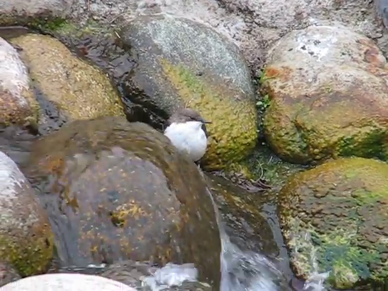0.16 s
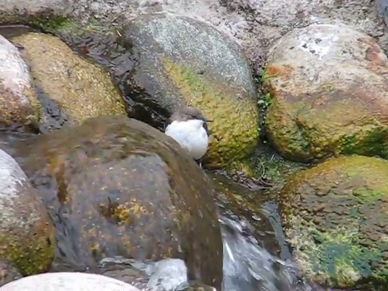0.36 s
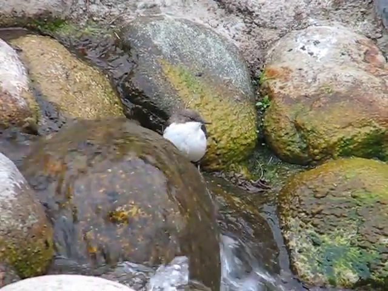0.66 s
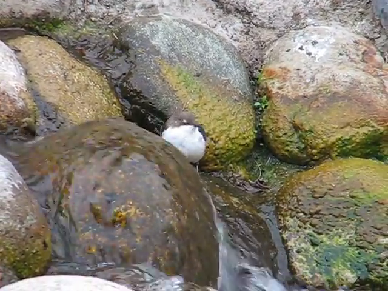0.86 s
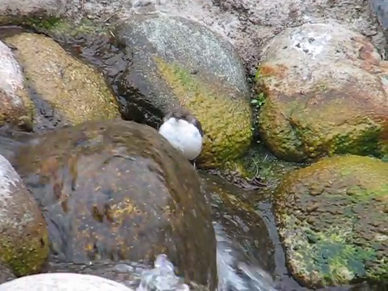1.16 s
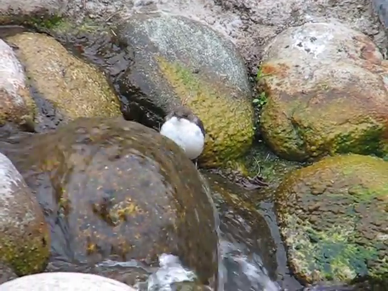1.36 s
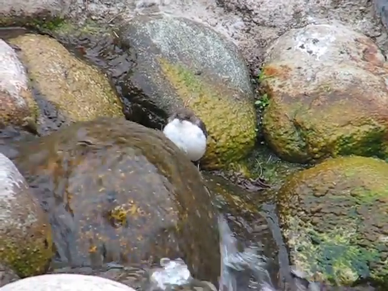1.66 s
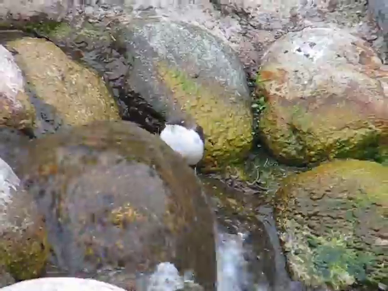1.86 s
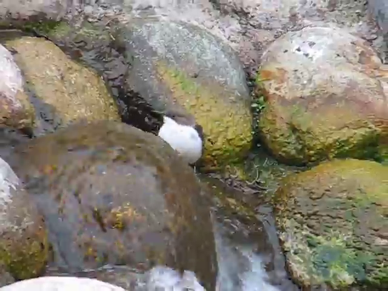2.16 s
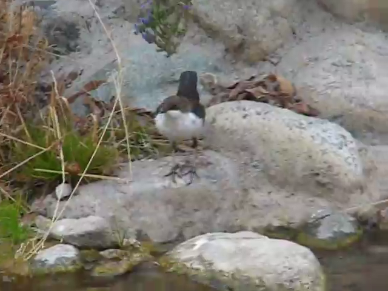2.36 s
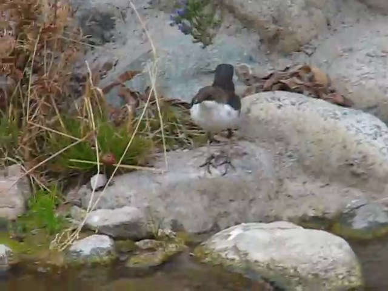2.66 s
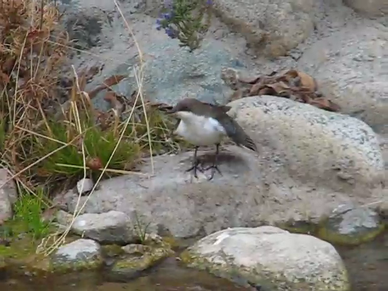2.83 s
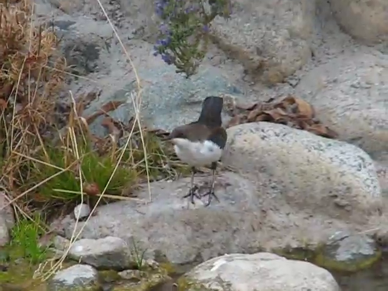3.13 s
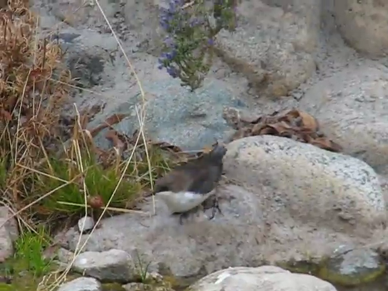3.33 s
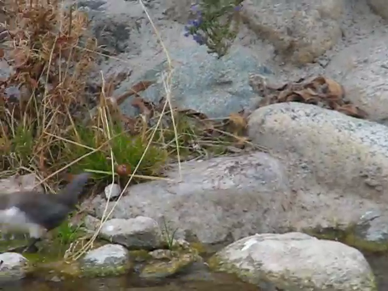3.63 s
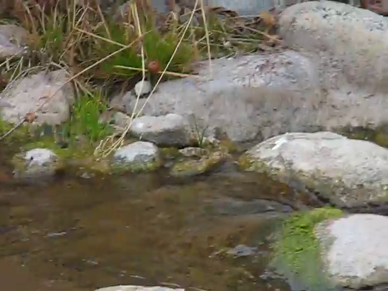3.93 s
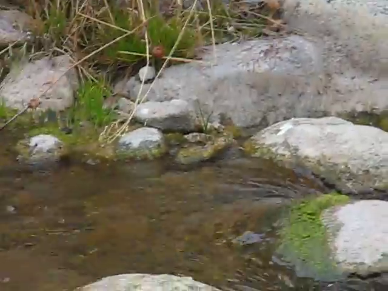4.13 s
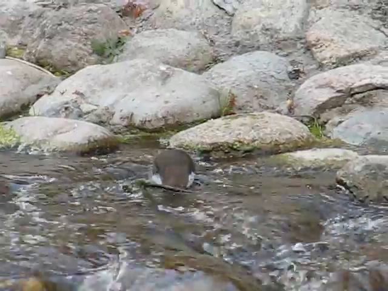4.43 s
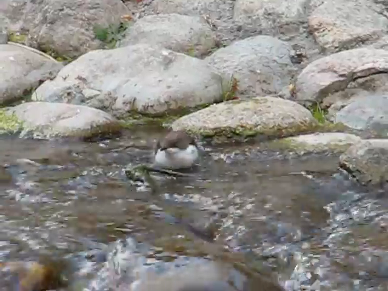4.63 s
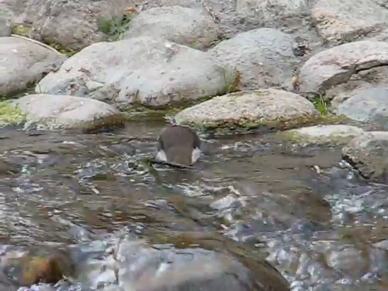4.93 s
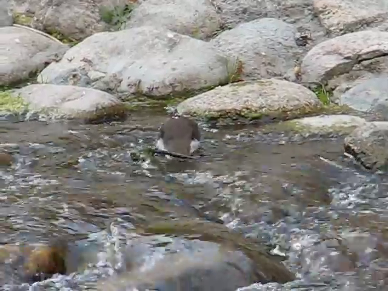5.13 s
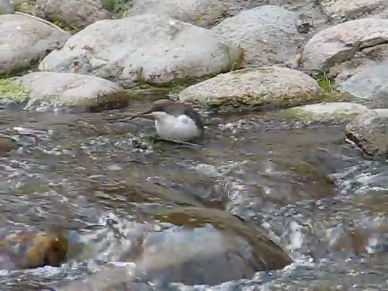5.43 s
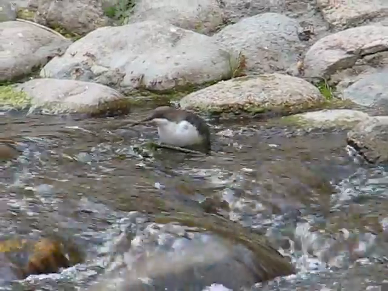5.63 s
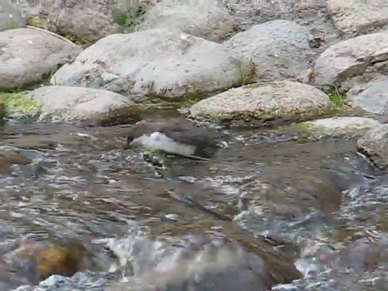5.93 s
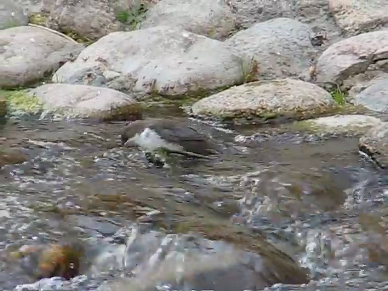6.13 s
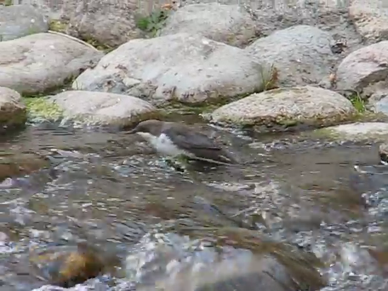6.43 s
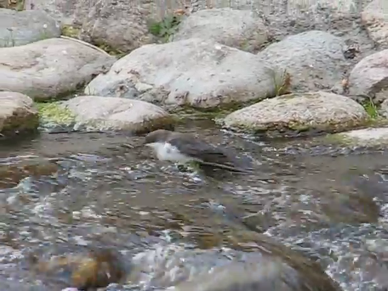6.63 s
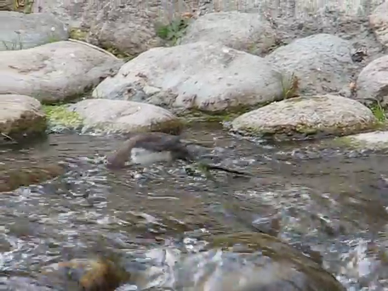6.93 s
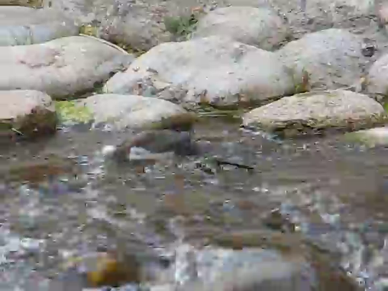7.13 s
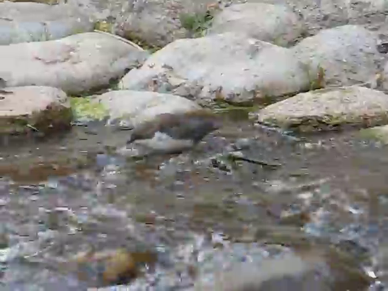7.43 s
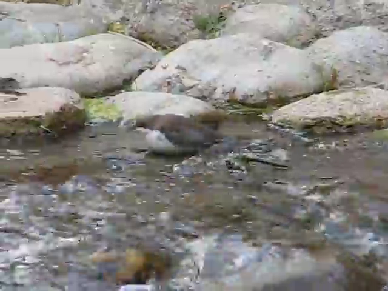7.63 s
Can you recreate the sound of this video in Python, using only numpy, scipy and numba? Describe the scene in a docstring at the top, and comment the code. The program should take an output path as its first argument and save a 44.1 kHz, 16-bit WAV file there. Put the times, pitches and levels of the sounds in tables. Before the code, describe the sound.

Water runs steadily over stones, bubbling and glugging, cutting out briefly once and dipping as the listening spot changes.

```python
"""Shallow stream over boulders

The water is heard from three spots on the bank in turn. Countless trapped bubbles ring as damped
oscillators and rise in pitch over a wash of far water; drops tick and large bubbles glug.
A gain control ducks after the loudest glugs. The sound drops out once, and it starts soft and
swells at each new spot."""
import sys
import numpy as np
from scipy import signal
from scipy.fft import rfft, irfft, next_fast_len
from scipy.io import wavfile
from scipy.ndimage import uniform_filter1d
from numba import njit

SR = 44100
rng = np.random.default_rng(int(sys.argv[2]) if len(sys.argv) > 2 else 0)


def dump(signal):
    """Clip the signal to [-1, 1] and save it as 16-bit WAV at the path in sys.argv[1]."""
    limited = np.clip(np.atleast_2d(signal).T, -1, 1)
    pcm = np.round(limited * 32767).astype(np.int16)
    wavfile.write(sys.argv[1], SR, pcm)


N = 343098


def from_db(db):
    """Amplitude ratio of a level in decibels."""
    return 10 ** (np.asarray(db) / 20)


def unit_rms(x):
    """Normalisation to unit power."""
    return x / np.sqrt(np.mean(x ** 2) + 1e-20)


def at_hz(points, hz):
    """Interpolation of a spectrum on a log-frequency axis."""
    knots_hz, values = np.transpose(points)
    return np.interp(np.log(hz), np.log(knots_hz), values)


def drift(corner_hz, size):
    """Slow random modulation of unit rms: noise through two one-pole low-passes."""
    hop = 40
    pole = np.exp(-2 * np.pi * corner_hz * hop / SR)
    slow = signal.lfilter([1], [1, -2 * pole, pole ** 2], rng.standard_normal(size // hop + 2002))[2000:]
    return np.interp(np.arange(size) / hop, np.arange(len(slow)), unit_rms(slow))


@njit
def add_rings(out, peak, hz, cycles, rise, height, onset):
    """Damped oscillations, `cycles` wide at half height, gliding up by the fraction `rise` per width."""
    for k in range(len(hz)):
        width = cycles[k] / hz[k] * SR
        for side in range(2):
            first = max(int(peak[k, side] - 2.5 * onset * width), 0)
            last = min(int(peak[k, side] + 4 * (1 - onset) * width), out.shape[1])
            for i in range(first, last):
                u = (i - peak[k, side]) / width
                # onset is the share of the width before the peak
                halvings = (u / onset) ** 2 if u < 0 else (u / (1 - onset)) ** 1.4
                phase = 2 * np.pi * cycles[k] * u * (1 + rise[k] * u / 2)
                out[side, i] += height[k, side] * 2 ** -halvings * np.cos(phase)


def small_bubbles(size, lag_us, spread_us, per_s, size_db):
    """Resonance of trapped air: bubbles of every pitch, each from its own direction, sum to a hiss."""
    born = np.flatnonzero(rng.random(size) < per_s * from_db(.9 * drift(14, size)) / SR)
    pitch, ring, strength, glide = rng.random((len(born), 4)).T
    hz = 120 + 15500 * pitch
    cycles = 2.32 + 7.6 * ring ** 2.82   # most ring briefly, a few sing
    level_db = size_db * np.minimum(-np.log(strength + 1e-9), 4.0)
    height = from_db(level_db) * np.sqrt(hz / cycles)   # short rings need more height for equal energy
    lag = (lag_us + spread_us * rng.standard_normal(len(born))) * SR / 1e6
    out = np.zeros((2, size))
    add_rings(out, np.c_[born + lag, born], hz, cycles, 0.251 * glide, np.c_[height, height], onset=.1)
    return unit_rms(out)


# Spectrum of the water at each spot: f/Hz, level/dB
SPECTRUM_FALL = [(15, -70), (25, -32.5), (119, -27), (160, -17), (379, -7.5), (524, -8), (632, -5),
                 (922, -1.5), (1240, -9.5), (1580, -8.5), (2780, -3.5), (5450, -8), (6760, -11.5),
                 (10200, -8.5), (12500, -25.5), (15600, -30.5)]
SPECTRUM_POOL = [(15, -53), (25, -20), (107, -23), (178, -9.5), (267, -13.5), (359, -4), (458, -4.5),
                 (763, -1), (1110, -7.5), (1270, -8.5), (2430, -5.5), (4280, -11.5), (8380, -14.5),
                 (10700, -16.5), (12500, -29), (15600, -31)]
SPECTRUM_RIFFLE = [(15, -65), (25, -33), (48, -32), (122, -24.5), (188, -10), (253, -14.5), (400, -5.5),
                   (446, -9.5), (616, -4), (947, -3.5), (1540, -11.5), (3180, -11), (7330, -22),
                   (10200, -18), (12500, -33), (15600, -41)]
# Left-right coherence of the wash: f/Hz, coherence (0 to 1)
COHERENCE_FALL = [(30, .4), (130, 1), (800, .97), (1300, 0.72), (4000, 0.84), (7000, 0.4), (9000, 0.9),
                  (14000, 0.3)]
COHERENCE_POOL = [(30, .4), (130, .97), (800, .97), (1300, 0.69), (4000, 0.6), (7000, 0.81), (10000, 0.84),
                  (14000, 1)]
COHERENCE_RIFFLE = [(30, .4), (130, 1), (800, 0.9), (1500, 0.18), (2600, 0.1), (4000, 0.064), (9000, 0.077),
                    (14000, 0.26)]
# Channel balance: f/Hz, left minus right level/dB
BALANCE_FALL = [(60, 4), (120, 1.5), (240, 0.5), (480, 1.5), (950, 0.5), (1890, -0.5), (3770, -1.5),
                (7520, 5), (15000, 1.5)]
BALANCE_POOL = [(60, 0.0), (120, 0), (240, 1), (480, 0.0), (950, 1.5), (1890, -1.5), (3770, -1.7),
                (7520, 3), (15000, 0)]
BALANCE_RIFFLE = [(60, 2), (120, -0.5), (240, 0.5), (480, -1), (950, 1.5), (1890, -3.5), (3770, -6),
                  (7520, 2), (15000, 0.5)]
# Small bubbles relative to the wash: f/Hz, level/dB
BUBBLE_SHARE = [(60, -20.5), (300, -1), (800, -2), (1600, -4), (2800, -5), (6000, -1.5), (13000, 2.5)]


def water(size, spot, lag_us, spread_us, per_s, size_db):
    """Partly coherent wash and bubbles add in power; a crossover parts low gurgle from high spray."""
    spectrum, coherence, balance = [(SPECTRUM_FALL, COHERENCE_FALL, BALANCE_FALL),
                                    (SPECTRUM_POOL, COHERENCE_POOL, BALANCE_POOL),
                                    (SPECTRUM_RIFFLE, COHERENCE_RIFFLE, BALANCE_RIFFLE)][spot]
    length = next_fast_len(size)
    hz = np.maximum(np.fft.rfftfreq(length, 1 / SR), 1)
    shared, left, right = rfft(rng.standard_normal((3, size)), length)
    coherent = np.clip(at_hz(coherence, hz), 0, 1)
    delay = np.exp(-2j * np.pi * hz * lag_us / 1e6)
    wash = np.sqrt(coherent) * np.array([shared * delay, shared])
    wash += np.sqrt(1 - coherent) * np.array([left, right])
    bubbles = rfft(small_bubbles(size, lag_us, spread_us, per_s, size_db), length)
    share = from_db(at_hz(BUBBLE_SHARE, hz))
    mix = (wash + share * bubbles) / np.sqrt(1 + share ** 2)
    mix *= from_db(at_hz(spectrum, hz) + at_hz(balance, hz) * [[.5], [-.5]])
    low = 1 / (1 + (hz / 1600) ** 8)   # crossover at 1600 Hz
    bands = irfft(np.array([mix * np.sqrt(low), mix * np.sqrt(1 - low)]), length)[..., :size]
    return [band / np.sqrt(np.mean(band.mean(axis=0) ** 2)) for band in bands]


def splash_gain(per_s=70, decay_s=.003):
    """Amplitude modulation of the spray: tiny splashes start at once and decay exponentially."""
    jumps = (rng.random(N) < per_s / SR) * np.minimum(rng.exponential(.26, N), .9)
    return 1 + signal.lfilter([1], [1, -np.exp(-1 / (decay_s * SR))], jumps)


# Full level at each spot: gurgle level/dB, spray level/dB
LEVELS = [(-24, -20.5), (-24, -22.5), (-24, -28.5)]
# Sudden dips in level: t/s, depth/dB
SOFT_STARTS = [(2.2022, 1), (2.2307, 9.5), (4.203, 10)]


def levels(t, recover_db_per_s=16):
    """Gurgle and spray levels in dB at times t; recovery from each dip is linear in decibels."""
    dip_db = sum((t >= start) * np.maximum(depth_db - recover_db_per_s * (t - start), 0)
                 for start, depth_db in SOFT_STARTS)
    return np.array(LEVELS)[spot_at(t)].T - dip_db


# Fall, pool and riffle: start t/s, end t/s, left lag/us, lag spread/us, bubble rate/s^-1, size spread/dB
SPOTS = [(0, 2.2305, 11, 12.0, 17900, 3), (2.23, 4.231, 26.4, 9.8, 16000.0, 3),
         (4.231, 7.78, 75, 61, 12000.0, 3)]
# Surging of the gurgle: t/s, relative level/dB
SURGE = [(0, -1), (.25, -1.5), (.5, 1.5), (.66, -1.5), (.9, 1.5), (1.3, -1), (1.8, 0.8), (1.9, -1.2),
         (2.8, 1), (3.3, -0.2), (3.6, -1.5), (4.2, 0.7), (4.8, 0), (5.05, 0), (5.55, 0), (6.0, -1),
         (6.16, 1), (6.35, 2), (6.55, -.8), (7.0, 0), (7.3, 0.9), (7.78, 0.8)]


def stream():
    """Slow amplitude modulation: the water at each spot in turn surges and wavers."""
    gurgle, spray = np.zeros((2, 2, N))
    for spot, (start, end, *bubble_settings) in enumerate(SPOTS):
        a, b = round(start * SR), min(round(end * SR), N)
        gurgle[:, a:b], spray[:, a:b] = water(b - a, spot, *bubble_settings)
    t = np.arange(N) / SR
    gurgle_db, spray_db = levels(t)
    gurgle *= from_db(gurgle_db + np.interp(t, *np.transpose(SURGE)) + 0.61 * drift(13.5, N))
    spray *= splash_gain() * from_db(spray_db + 0.15 * drift(40, N))
    return gurgle + spray


def spot_at(t):
    """Index of the listening position at times t."""
    return np.minimum(np.searchsorted(np.array(SPOTS)[:, 1], t), len(SPOTS) - 1)


def spatter(per_s=40, low_hz=2500, high_hz=11000, spread_db=1.5, pan_db=4):
    """Poisson process of small drops, as rows like those of DROPS."""
    t = np.flatnonzero(rng.random(N) < per_s / SR) / SR
    strength, pitch, side = rng.random((len(t), 3)).T
    hz = low_hz + (high_hz - low_hz) * pitch
    over_spray_db = 4 - 4.5 * np.log2(hz / low_hz)   # higher drops are smaller
    peak_db = levels(t)[1] + over_spray_db - spread_db * np.log(strength + .02)
    return np.c_[t, peak_db, hz, pan_db * (2 * side - 1)]


# Drops hitting stone or water: t/s, ring level/dB, f/Hz, left minus right level/dB
DROPS = [(0.1134, -11, 8530, 7), (0.2643, -6.5, 2900, -1.6), (0.3603, -8, 9000, 7),
         (0.5303, -11, 9060, 2.6), (0.7265, -13, 5600, -0.7), (1.0413, -5, 9000, 1.2),
         (1.2398, -6, 8850, 8), (1.2654, -19, 10810, 1), (3.372, -10.5, 2400, -1.5), (3.3724, -7, 8600, 7),
         (3.7062, -11, 7780, 3.8), (3.8546, -15, 6890, -1.1), (3.8932, -20, 12260, -6.1),
         (4.1675, -17, 8900, 0.9), (4.3746, -24, 2710, -1.7), (4.734, -20, 5960, 8),
         (4.912, -15, 3890, -1.5), (4.9369, -19, 8700, -0.2), (5.1015, -8, 10900, 5.5),
         (5.472, -21, 7130, 1), (5.9119, -23, 3700, -2.6), (6.1216, -12, 6100, -0.5),
         (6.2146, -19, 8570, -0.9), (6.4524, -15, 7197, 0.1), (6.4727, -18, 3780, -13),
         (6.72, -16, 9830, 5.1), (6.9101, -21, 6110, -5.9), (7.143, -13, 9740, 1.8),
         (7.1578, -13, 8000, -0.1), (7.1583, -17, 3050, -3.5), (7.2796, -15, 10270, 1.6),
         (7.3055, -14, 9350, 2.5), (7.3961, -20, 11200, 0.9)]


def drops(top_hz=11600):
    """Impact excitation: each drop cracks, then rings for a few cycles; a low-pass dulls the top."""
    t, peak_db, hz, pan_db = np.transpose(np.r_[DROPS, spatter()])
    out, each = np.zeros((2, N)), np.ones(len(t))
    peak = np.c_[t, t] * SR
    ring = from_db(np.c_[peak_db + pan_db / 2, peak_db - pan_db / 2])
    crack = from_db(-10) * ring
    add_rings(out, peak, hz, cycles=4.2 * each, rise=.06 * each, height=ring, onset=.15)
    add_rings(out, peak, hz, cycles=1.3 * each, rise=0 * each, height=crack, onset=.15)
    return signal.sosfilt(signal.butter(2, top_hz, fs=SR, output="sos"), out + 1e-18)


def babble(per_s=30, over_gurgle_db=-0.5, spread_db=2.0):
    """Poisson process of further, quieter glugs at random times, as rows like those of GLUGS."""
    t = np.flatnonzero(rng.random(N - 1) < per_s / SR) / SR
    strength, pitch, ring = rng.random((len(t), 3)).T
    peak_db = levels(t)[0] + over_gurgle_db - spread_db * np.log(strength + .03)
    hz = np.interp(pitch, [0, 1], [553, 1323])
    cycles = np.interp(ring, [0, 1], [2.3, 7.3])
    return np.c_[t, peak_db, hz, cycles]


# Large bubbles: t/s, level/dB, f/Hz, cycles above half height
GLUGS = [(0.2989, -19, 970, 4.2), (0.5197, -11, 1500, 2.3), (1.0413, -17, 839, 2.9),
         (1.1825, -13, 935, 3.2), (1.3548, -11, 1803, 2.8), (1.3581, -18, 383, 3.9),
         (1.5728, -13.8, 1740, 3.5), (1.7512, -13, 945, 4.36), (1.7762, -11, 836, 3.5),
         (1.7845, -13, 870, 2.9), (1.817, -8, 980, 2.6), (2.6325, -19, 450, 1.9),
         (3.4911, -16.5, 396.2, 2.85), (3.6877, -20, 960, 2.88), (3.8281, -10, 1296, 2.5),
         (3.98, -13, 1337, 3.4), (3.9958, -18, 1210, 4.3), (4.537, -16, 1150, 3.4),
         (4.6617, -19, 1430, 2.4), (5.2345, -18, 530, 13), (5.2485, -6.5, 646, 3.1), (5.3138, -8.5, 880, 1),
         (5.4114, -9.5, 1209, 3.1), (5.6723, -13.5, 1040, 4.3), (5.756, -16, 637, 4.1),
         (5.875, -6.5, 840, 1.3), (6.123, -13, 810, 5.3), (6.223, -2.5, 900, 2.95),
         (6.6289, -11.5, 652, 2.9), (7.4421, -17, 482, 3.83), (7.4592, -5.5, 910, 5.2),
         (7.5802, -14, 635, 5.1), (7.7216, -12.5, 970, 5)]


def glugs(octaves_per_cycle=0.045):
    """Resonance of large bubbles closing over between stones; the longer the ring, the more it climbs."""
    t, peak_db, hz, cycles = np.transpose(np.r_[GLUGS, babble()])
    out, height = np.zeros((2, N)), from_db(peak_db)
    left_lag_s = np.array(SPOTS)[spot_at(t), 2] / 1e6
    rise = 2 ** (octaves_per_cycle * cycles) - 1
    add_rings(out, np.c_[t + left_lag_s, t] * SR, hz, cycles, rise, np.c_[height, height], onset=.45)
    return out


def scene():
    """Linear superposition of stream, glugs and drops."""
    return stream() + glugs() + drops()


def gain_control(x, threshold_db=-13.5, sense_s=0.007, release_db_per_s=26):
    """Limiting: the gain falls by the excess of short-term power over a threshold, then climbs back."""
    power = uniform_filter1d(np.mean(x ** 2, axis=0), round(sense_s * SR))
    over_db = np.maximum(10 * np.log10(np.abs(power) + 1e-12) - threshold_db, 0)
    climb_db = release_db_per_s * np.arange(N) / SR
    duck_db = np.maximum.accumulate(over_db + climb_db) - climb_db
    pole = np.exp(-1 / (sense_s * SR))
    return x * from_db(-signal.lfilter([1 - pole], [1, -pole], duck_db))


def record(dry):
    """Gain control, a dropout of a tenth of a second, and band limiting at 15750 Hz."""
    t = np.arange(N) / SR
    gate = (t < 2.0965) | (t > 2.2022)
    low_pass = signal.ellip(12, .5, 70, 15750, fs=SR, output="sos")
    return signal.sosfilt(low_pass, gain_control(dry) * gate)


dry = scene()
out = record(dry)
dump(out)
```